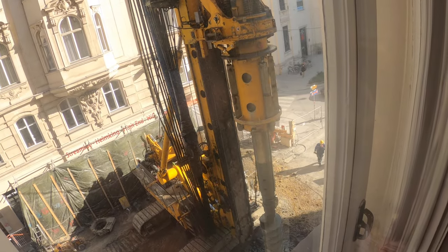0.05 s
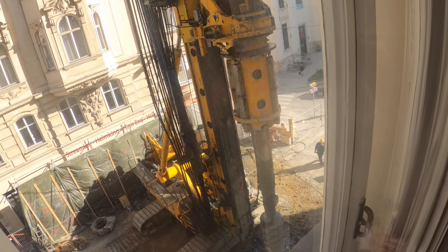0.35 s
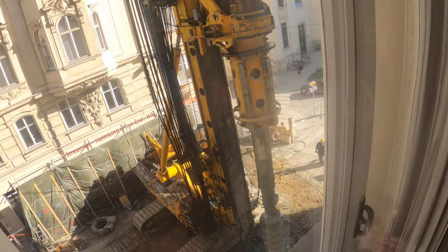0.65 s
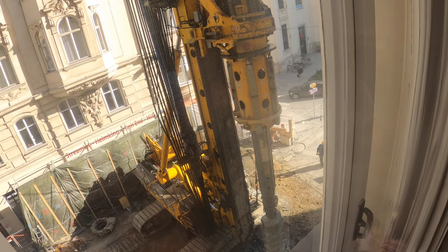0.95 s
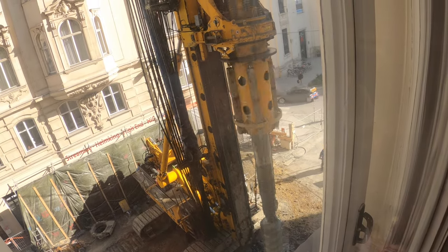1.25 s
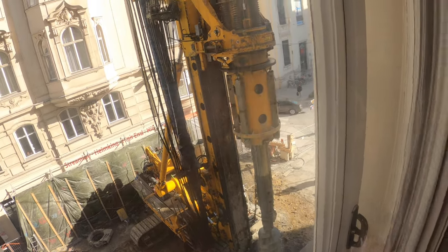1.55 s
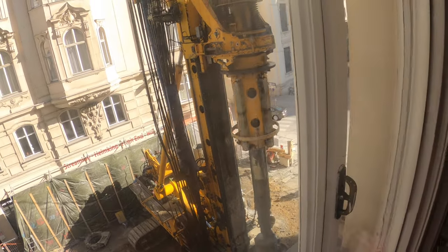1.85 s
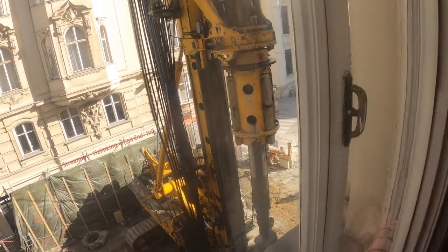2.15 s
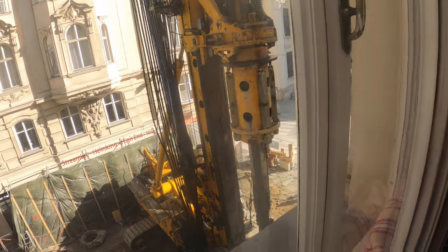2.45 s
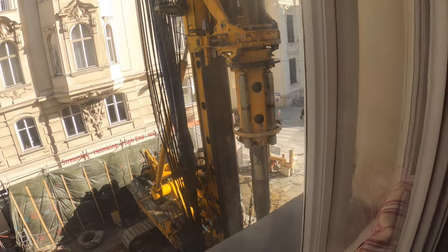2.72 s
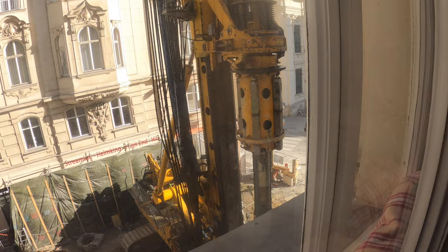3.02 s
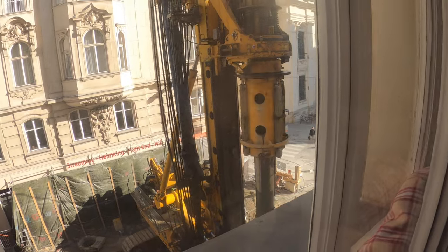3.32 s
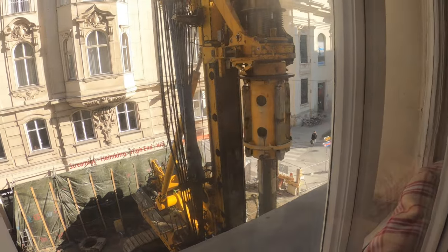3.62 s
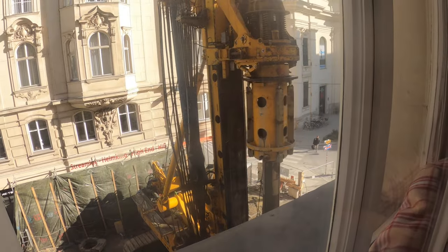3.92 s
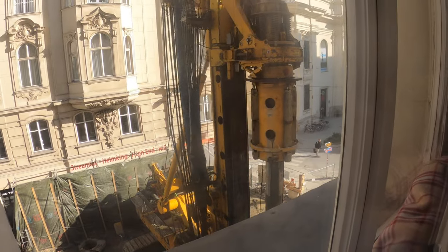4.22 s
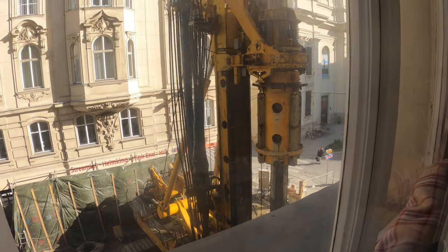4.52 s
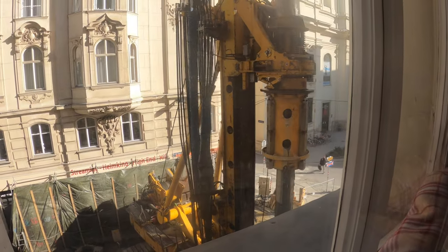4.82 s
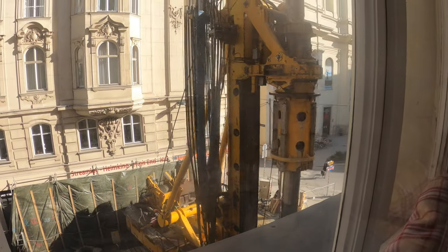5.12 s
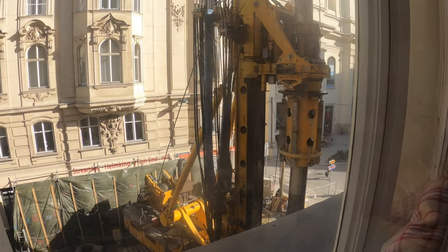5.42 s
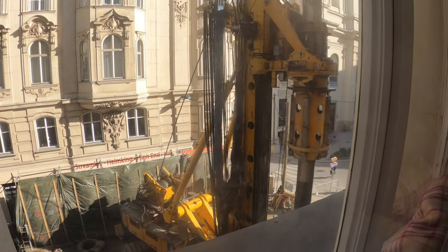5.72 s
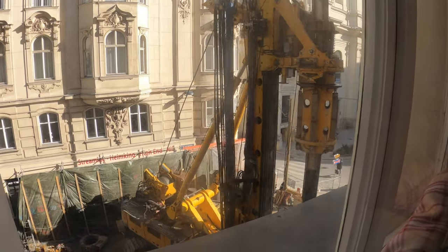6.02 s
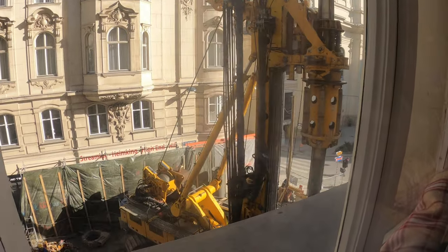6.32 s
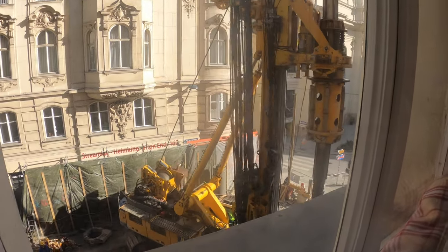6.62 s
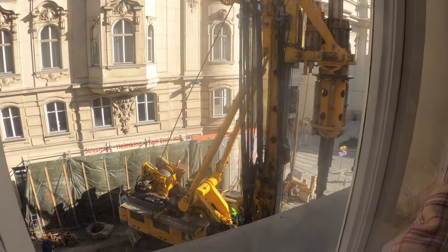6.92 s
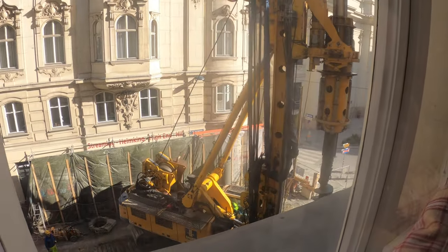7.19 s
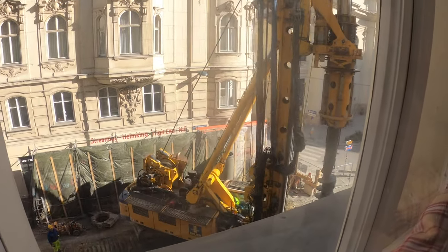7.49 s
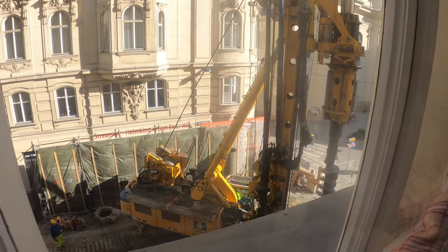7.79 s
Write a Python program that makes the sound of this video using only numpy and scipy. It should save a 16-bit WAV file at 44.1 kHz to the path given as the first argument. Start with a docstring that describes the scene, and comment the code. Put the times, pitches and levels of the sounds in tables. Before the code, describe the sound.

A large drilling rig works in a city street, heard from indoors through a closed window. Its steel drill bar knocks, clangs and scrapes in irregular bunches over a hydraulic hiss, each blow echoing off the house fronts and booming in the panes. About halfway the knocks weaken and stop. The diesel engine hums on, sags briefly, then grows louder with soft pump whines and a faint rising whistle.

```python
"""Piling rig behind a closed window

A rotary drive jerks a drill bar to and fro in a city street: the steel knocks, scrapes and rebounds,
the house fronts scatter each blow and the panes boom with it. Then the diesel hums on, sags under
load and recovers with a rising turbo whistle, among pump whines and faint squeals of dry steel."""
import sys
import numpy as np
from scipy import signal
from scipy.fft import rfft, irfft, next_fast_len
from scipy.io import wavfile
from scipy.ndimage import uniform_filter1d, map_coordinates

SR = 44100
rng = np.random.default_rng(int(sys.argv[2]) if len(sys.argv) > 2 else 0)


def generate_wav(signal):
    """Clip the signal to [-1, 1] and save it as 16-bit WAV at the path in sys.argv[1]."""
    frames = np.transpose(np.atleast_2d(signal))
    scaled = np.clip(frames, -1, 1) * 32767
    pcm = np.round(scaled).astype(np.int16)
    wavfile.write(sys.argv[1], SR, pcm)


N = 350595


def amp(db):
    return 10 ** (np.asarray(db) / 20)


def unit(x):
    return x / np.sqrt(np.mean(x ** 2) + 1e-20)


def along(points, hz):
    """Read (Hz, value) points on a log frequency axis."""
    freqs, values = np.transpose(points)
    return np.interp(np.log(hz + 1), np.log(freqs + 1), values)


def curve(points):
    """Automation: (s, value) points drawn out to one value per sample."""
    return np.interp(np.arange(N) / SR, *np.transpose(points))


def wobble(rate):
    """A smooth random curve, rate knots a second."""
    return map_coordinates(rng.standard_normal(8192), [np.arange(N) * rate / SR], mode="wrap")


def phase_of(hz):
    """Phase in radians of a moving frequency."""
    return 2 * np.pi * np.cumsum(hz) / SR


def shape(points):
    """The response of a (Hz, dB) spectrum."""
    return lambda f: amp(along(points, f))


def resonances(modes):
    """The response of (Hz, width, dB) peaks with steep skirts."""
    return lambda f: sum(amp(db) / (1 + ((f * f - hz * hz) / ((f + 1) * width * np.sqrt(2))) ** 2)
                         for hz, width, db in modes)


def noise(response, size=N):
    """Coloured noise of rms 1."""
    m = next_fast_len(size)
    spectrum = rfft(rng.standard_normal(m)) * response(np.fft.rfftfreq(m, 1 / SR))
    return unit(irfft(spectrum, m)[:size])


def patchy(x, depth_db):
    """Shifting reflections lift and sink patches of the spectrum."""
    frames = signal.stft(x, nperseg=1024)[2]
    patches = uniform_filter1d(rng.standard_normal(frames.shape), size=3, axis=0)
    patches = uniform_filter1d(patches, size=24, axis=1)
    return unit(signal.istft(frames * amp(depth_db * unit(patches)), nperseg=1024)[1][:len(x)])


def ringing(modes, size=SR):
    """Resonances fed by dense echoes: they beat quickly but hold their strength."""
    x = noise(resonances(modes), size)
    power = np.abs(uniform_filter1d(x * x, size=SR // 40))
    return x / np.sqrt(power + 1e-6)


def whine(hz, level_db, flutter_hz, waver):
    """A wavering tone; its many paths across the street make it flutter."""
    phase = phase_of(hz * (1 + waver * wobble(11)))
    return amp(level_db) * unit(wobble(flutter_hz) * np.sin(phase) + wobble(flutter_hz) * np.cos(phase))


def fade(t, rise, hold, t60):
    """Echoes build up, last while they cross the street, then die (times in s)."""
    return (1 - np.exp(-t / rise)) * amp(-60 * np.maximum(t - hold, 0) / t60)


def swell(x, length):
    """The first length seconds of x, eased in and out."""
    size = round(length * SR)
    return np.sqrt(np.hanning(size)) * x[:size]


def add(track, s, x):
    """Mix x into the track from time s."""
    start = round(s * SR)
    track[start:start + len(x)] += x[:max(N - start, 0)]


def site():
    """Site machines running at fixed speed drone low, slightly unsteady."""
    # machine drones (frequency [Hz], level [dB])
    tones = [(33.4, -40.5), (67, -41)]
    return np.sqrt(2) * sum(amp(db + 0.89 * wobble(8.6)) * np.sin(phase_of(hz * (1 + 0.0034 * wobble(13))))
                            for hz, db in tones)


def tick(at_s=5.04, level_db=-69):
    """One small bright tick close by."""
    out, t = np.zeros(N), np.arange(SR // 4) / SR
    bright = noise(shape([(1500, -4.5), (4500, -7.5), (7200, 1), (8500, -3), (9400, -25)]), len(t))
    add(out, at_s, amp(level_db) * bright * fade(t, rise=0.003, hold=0.011, t60=0.12))
    return out


def load_db(full_db=-52):
    """Engine load in dB relative to full load."""
    # engine effort (time [s], level [dB])
    effort = [(3.4, -62), (4.4, -61.5), (5.25, -62.5), (5.7, -59.5), (6.35, -58), (6.9, -56), (7.35, -54.3),
              (7.7, -56)]
    return curve(effort) - full_db


def diesel():
    """Six cylinders fire three times a turn: a strong hum, weak crank orders, rumble and clatter."""
    # engine speed (time [s], firing rate [Hz])
    speed = [(4.0, 95.9), (4.2, 93.17), (4.54, 93.43), (4.7, 91.45), (5.36, 88.05), (5.59, 84.65),
             (6.02, 88.2), (6.4, 89.7), (7.0, 92.4), (7.28, 92.4), (7.42, 94.66), (7.95, 94.5)]
    # exhaust hum (time [s], level [dB])
    hum_levels = [(2.6, -36.5), (4.55, -30.5), (4.95, -35.5), (5.2, -27.5), (5.48, -27), (5.61, -40.5),
                  (5.72, -28.5), (6.25, -22.5), (6.55, -27), (7.4, -30), (7.56, -24.5), (7.95, -27.5)]
    # weaker engine tones (multiple of crank speed, level [dB])
    crank_orders = [(1, -57.5), (2, -50.5), (4, -54.5), (4.5, -53), (5, -46.5), (5.5, -53), (6, -42.5),
                    (7, -50), (9, -53.5), (10, -54.5), (10.5, -56)]
    # low engine rumble (frequency [Hz], level [dB])
    rumble_eq = [(12, -27), (28, 0), (48, 0.5), (76, 3.5), (100, 3.5), (125, -1.5), (175, -2), (250, -7.5),
                 (320, -15.5), (370, -15.5), (440, -45.5), (700, -83)]
    # engine cover, shaken by the firing (frequency [Hz], width [Hz], level [dB])
    cover_modes = [(314.8, 34, 7), (1290, 76, -22), (1494, 60, -26)]
    # mechanical clatter (frequency [Hz], level [dB])
    clatter_eq = [(250, -24.5), (400, -2), (480, -3), (730, -3), (950, -13), (1350, -10), (2000, -14.5),
                  (2700, -17), (4000, -24), (5000, -27.5), (7000, -27), (8600, -35.5), (9600, -44.5),
                  (12000, -71.5)]
    firing = phase_of(curve(speed) * (1 + 0.0028 * wobble(9)))
    crank = firing / 3
    hum = amp(curve(hum_levels) + 0.39 * wobble(6)) * np.sin(firing)
    orders = sum(amp(db + 2.66 * wobble(3)) * np.sin(order * crank + 0.5 * wobble(4.2))
                 for order, db in crank_orders)
    rumble = amp(-30 + 0.49 * load_db()) * noise(shape(rumble_eq))
    cover = amp(-43.5 + 0.9 * load_db()) * noise(resonances(cover_modes))
    pulsing = amp(-49.5 + load_db() + 0.52 * wobble(6.2)) * (1 + 0.054 * np.sin(firing))
    clatter = pulsing * patchy(noise(shape(clatter_eq)), depth_db=1.7)
    return np.sqrt(2) * (hum + orders) + rumble + cover + clatter


def turbo(fade_in_s=0.23):
    """A thin whistle over a band of rushing air; both climb with boost and grow with load."""
    # turbo whistle (time [s], pitch [Hz])
    glide = [(5.8, 6361), (6.3, 6502), (6.75, 6834), (7.1, 7264), (7.42, 7437), (7.65, 7300), (7.95, 7083)]
    hz = curve(glide)
    spool = np.clip((np.arange(N) / SR - glide[0][0]) / fade_in_s, 0, 1)
    level_db = -75 + 1.6 * load_db()
    air = whine(0.88 * hz, level_db - 6.5, flutter_hz=500, waver=0.004)
    whistle = whine(hz, level_db, flutter_hz=85, waver=0.0016)
    return spool * (whistle + air)


def pump():
    """The hydraulic pump whines in short spells as it takes up load."""
    # pump whines (time [s], length [s], pitch [Hz], level [dB])
    spells = [(5.85, 0.56, 660, -62.5), (7.1, 0.44, 707, -55.5), (7.55, 0.63, 513, -56.5),
              (7.6, 0.41, 952, -64.5)]
    out = np.zeros(N)
    for s, length, hz, db in spells:
        add(out, s, swell(whine(hz, db, flutter_hz=40, waver=0.005), length))
    return out


def drive():
    """Oil hisses through the rotary drive while it jerks the bar, until the bar comes free."""
    # oil rush (time [s], level [dB])
    flow = [(0, -45), (0.4, -51.5), (0.8, -51.5), (1.35, -48), (1.8, -51.5), (2.05, -55), (2.7, -52),
            (3.15, -57.5), (3.55, -58.5), (4.2, -80.5)]
    # colour of the hiss (frequency [Hz], level [dB])
    hiss_eq = [(200, -21.5), (450, 12.5), (900, 1.5), (1600, -2.5), (2600, -9), (4100, -11), (5000, -19.5),
               (7000, -24), (8000, -31), (8700, -26.5), (9600, -49), (11500, -72)]
    return amp(curve(flow) + 0.5 * wobble(15)) * patchy(noise(shape(hiss_eq)), depth_db=1.7)


def friction():
    """Steel rubbing on steel sings briefly on a narrow resonance; a wide one sounds as a scrape, or as a burst
    of hiss from the hydraulic valves."""
    # dry steel squealing (time [s], length [s], pitch [Hz], level [dB])
    squeals = [(4.16, 0.42, 6370, -82), (4.22, .38, 3680, -78.5), (4.2, .34, 5700, -85),
               (4.62, 0.42, 3660, -78.5), (4.58, 0.38, 6310, -80), (4.62, .3, 5700, -84.5),
               (4.75, .37, 5130, -84), (5.25, .26, 2760, -75), (6.02, 0.42, 5720, -79.5)]
    # the bar rubbing in its guide, and bursts of hydraulic valve hiss near 4-5 kHz at 0.42, 1.8 and 2.38 s
    # (time [s], length [s], centre [Hz], level [dB])
    rubs = [(0.416, 0.58, 3900, -70.5), (.72, .28, 1712, -55), (1.801, 0.76, 4050, -68),
            (2.12, .2, 950, -54), (2.156, 0.18, 1630, -51.5), (2.38, .42, 4800, -70),
            (4.7, .24, 690, -61.5), (4.68, .36, 1480, -64.5), (4.7, .46, 2450, -70),
            (5.6, .25, 2650, -68.5), (5.56, 0.35, 3900, -73), (6.55, .7, 1150, -63)]
    out = np.zeros(N)
    for s, length, hz, db in squeals:
        add(out, s, swell(whine(hz, db, flutter_hz=160, waver=0.001), length))
    for s, length, hz, db in rubs:
        wide_band = ringing([(hz, 0.26 * hz, 0)], round(length * SR))
        add(out, s, amp(db) * swell(wide_band, length))
    return out


def struck(modes, spread_db=3):
    """Each blow lands elsewhere, so the steel rings with a new balance of its resonances."""
    return ringing([(hz, width, db + spread_db * rng.standard_normal()) for hz, width, db in modes])


def steel(t, clang_db, scrape_db):
    """Steel meets steel: a clang, a gritty scrape and a punch on the casing, with street echo tails."""
    # body of the clang (frequency [Hz], width [Hz], level [dB])
    low_modes = [(314, 11, 5.5), (348, 26, 5), (400, 88, -2), (425, 12, 2.5), (486, 14, 9), (534, 40, -2),
                 (629, 4.1, 0), (712, 58, -5), (827, 20, -14), (907, 10, -9.5), (947, 14, -8),
                 (1190, 26, -13)]
    # bright steel overtones (frequency [Hz], width [Hz], level [dB])
    high_modes = [(1340, 340, 5), (1745, 41, 5.5), (2245, 23, 1), (2370, 30, -3), (2845, 40, 1),
                  (3490, 22, -1), (3710, 34, -1.5), (4055, 32, -4.5), (4475, 50, -5.5), (5170, 50, -11.5),
                  (5950, 70, -13), (8560, 81, -18)]
    # drill casing resonances (frequency [Hz], width [Hz], level [dB])
    casing_modes = [(235.5, 30, 0.5), (298.6, 33, 2), (342, 35, -3), (413, 30, -8)]
    # scraping grit (frequency [Hz], level [dB])
    grit_eq = [(200, -21), (450, -4.5), (900, 6), (1300, -4.5), (1950, -2.5), (2600, -9.5), (4200, -15.5),
               (5200, -26), (8500, -29), (10000, -49.5), (12000, -59)]
    # echo between the house fronts (frequency [Hz], t60 [s])
    street = [(500, 0.85), (2000, 0.48)]
    clang = amp(clang_db) * struck(low_modes) * fade(t, rise=0.01, hold=0.029, t60=along(street, 1000))
    grit = patchy(noise(shape(grit_eq), SR), depth_db=2.5) + amp(-3) * struck(high_modes)
    scrape = amp(scrape_db) * grit * fade(t, rise=0.02, hold=0.043, t60=along(street, 2000))
    punch = amp(clang_db + 4.5) * ringing(casing_modes) * fade(t, rise=0.015, hold=0.014, t60=0.38)
    return clang + punch + scrape


def panes(t, thud_db, boom_db, boom_hz, focus_db_per_octave=32):
    """The glass passes bass at its own resonances; a blow favours those near its boom pitch."""
    # thud of the window and the room behind it (frequency [Hz], width [Hz], level [dB])
    thud_modes = [(33.2, 10, -19), (58.4, 8.3, -5.5), (77.3, 11, -3), (90.9, 11, 4)]
    # their higher boom (frequency [Hz], width [Hz], level [dB])
    boom_modes = [(158.6, 16, 0), (167.6, 13, -0.5), (179.8, 6.2, -1), (197.6, 13, -2), (230.5, 18, -2.5),
                  (286, 27, -4.5)]
    focused = [(hz, width, db - focus_db_per_octave * abs(np.log2(hz / boom_hz)))
               for hz, width, db in boom_modes]
    shake = amp(thud_db) * ringing(thud_modes) + amp(boom_db) * ringing(focused)
    return shake * fade(t, rise=0.005, hold=0.032, t60=0.71)


def knocks():
    """Each jerk is a bunch of blows: the bar takes up its play, strikes with a crack and rebounds."""
    # drill bar blows (time [s], thud [dB], boom [dB], boom pitch [Hz], clang [dB], scrape [dB], crack [dB])
    blows = [(.002, -30, -27, 200, -50, -54.5, -74), (.066, -14.5, -17.5, 224, -34, -44.5, -44.5),
             (.13, -22.5, -25.5, 235, -32.5, -50, -51), (.192, -22, -24, 177, -34.5, -54.5, -55),
             (.285, -30.5, -26, 166, -47.5, -63, -78), (.722, -31.5, -31.5, 229, -42.5, -51.5, -51),
             (.762, -28, -28, 234, -41.5, -54, -63), (.815, -27, -29, 189, -43.5, -50.5, -60),
             (.908, -26, -25, 200, -38, -59, -65), (.975, -26.5, -25.5, 192, -40.5, -65, -69),
             (1.385, -32, -27.5, 175, -43, -51.5, -59), (1.437, -20, -18, 192, -36.5, -43, -46),
             (1.482, -17.5, -13.5, 195.5, -34.5, -43.5, -49.5), (1.555, -22, -24.5, 192.9, -33.5, -53, -64),
             (2.061, -32, -30.5, 178, -60.5, -62, -71), (2.112, -40.5, -29.5, 190, -44.5, -60, -57),
             (2.155, -25, -28, 169, -42, -54.5, -60), (2.218, -36, -30.5, 175, -47.5, -60, -54),
             (2.282, -41.5, -21.5, 170, -49, -59, -73), (2.68, -29, -31, 175, -55.5, -65, -73),
             (2.73, -25.5, -27.5, 175, -56, -60, -69), (2.792, -17, -14, 173, -34, -48, -44.5),
             (2.84, -21, -23.5, 166.4, -34, -53.5, -53.5), (2.892, -21.5, -17.5, 168, -35.5, -55, -54.5),
             (3.07, -28, -27.5, 165, -55.5, -74, -75), (3.31, -33.5, -25, 177, -61, -70.5, -76),
             (3.373, -19.5, -27, 180, -43.5, -52, -58), (3.44, -29, -23, 182, -40, -61.5, -71),
             (3.502, -25.5, -18, 175, -45, -63, -67), (3.779, -25, -27, 163, -61.5, -69.5, -75),
             (3.874, -22.5, -28, 157, -57.5, -70, -79), (3.95, -25.5, -24, 153, -51.5, -62.5, -73),
             (4.01, -29, -25.5, 158, -60, -75, -77), (4.26, -29, -31.5, 160, -64, -69.5, -75),
             (5.974, -31, -37, 195, -58, -77.5, -79), (6.045, -26, -32.5, 199, -64.5, -71.5, -75)]
    # bright attack of a blow (frequency [Hz], level [dB])
    crack_eq = [(300, -29), (1200, 8), (3600, 7.5), (6000, 1), (8300, -6.5), (9500, -20), (13000, -37)]
    out, t = np.zeros(N), np.arange(SR) / SR
    for s, thud_db, boom_db, boom_hz, clang_db, scrape_db, crack_db in blows:
        burst = patchy(noise(shape(crack_eq), SR), depth_db=3.5)
        crack = amp(crack_db) * burst * fade(t, rise=0.012, hold=0.0057, t60=0.25)
        add(out, s, crack + steel(t, clang_db, scrape_db) + panes(t, thud_db, boom_db, boom_hz))
    return out


def scene():
    """The rig over the drone of the site, in mono."""
    return (knocks() + drive() + diesel() + turbo() + pump() + friction() + site() + tick())[None]


def record(dry, top_hz=13200):
    """Very short fades at both ends and a brick-wall high cut."""
    m = next_fast_len(N + SR // 2)
    edges = signal.windows.tukey(N, 0.001)
    passband = np.fft.rfftfreq(m, 1 / SR) < top_hz
    return irfft(rfft(dry * edges, m) * passband, m)[:, :N]


dry = scene()
out = record(dry)
generate_wav(out)
```